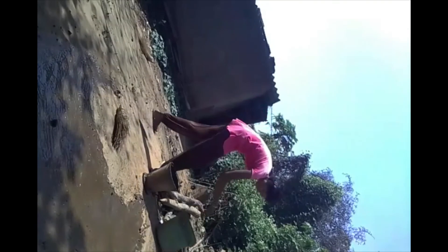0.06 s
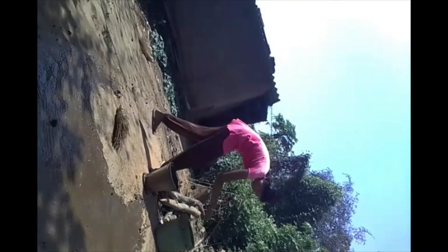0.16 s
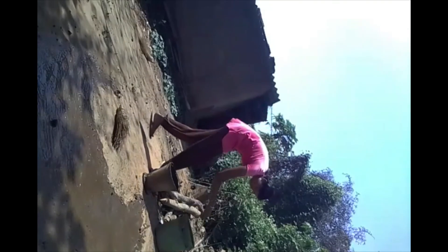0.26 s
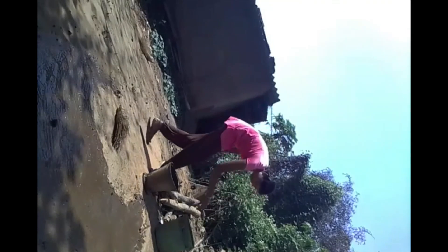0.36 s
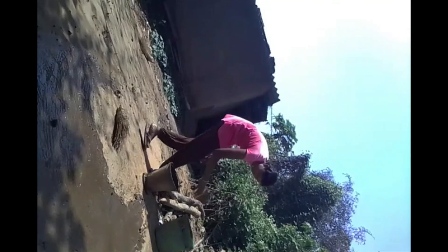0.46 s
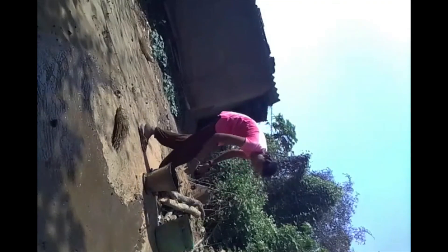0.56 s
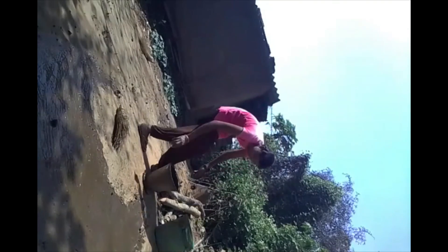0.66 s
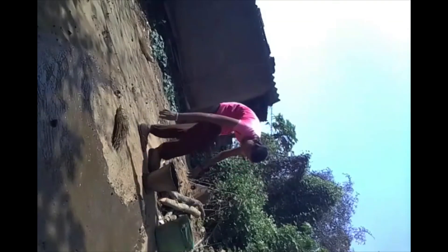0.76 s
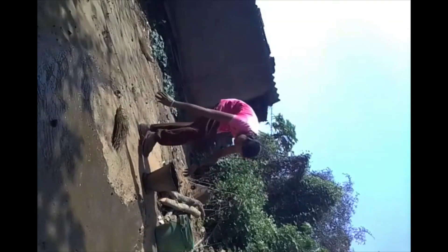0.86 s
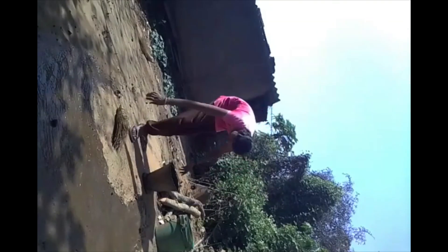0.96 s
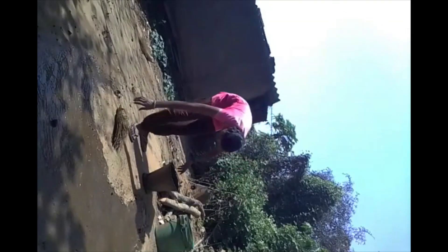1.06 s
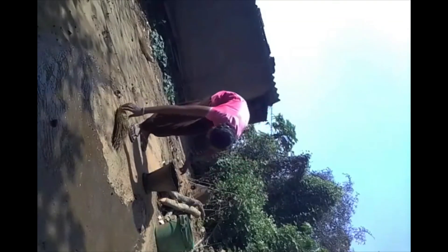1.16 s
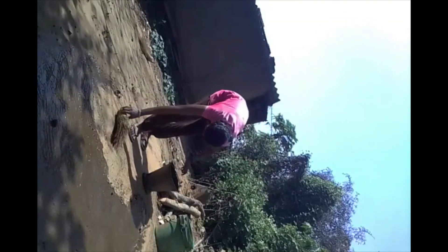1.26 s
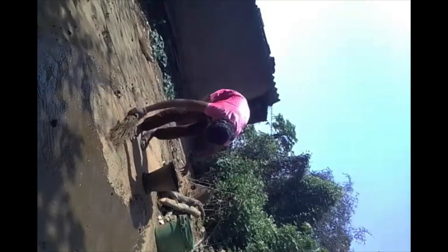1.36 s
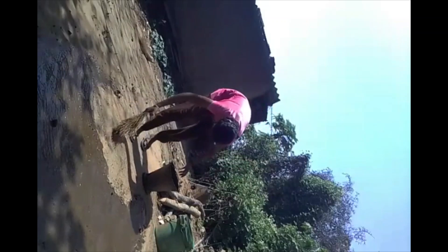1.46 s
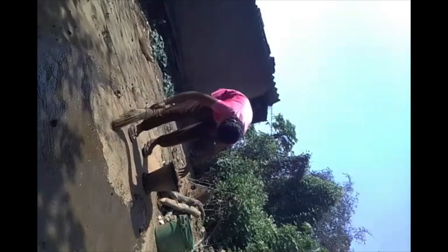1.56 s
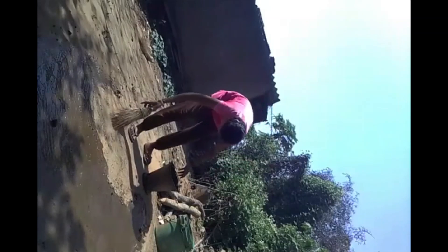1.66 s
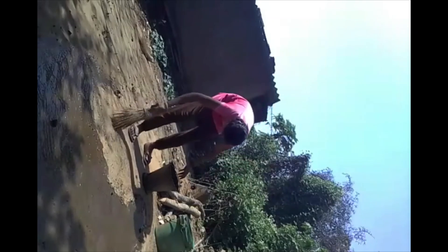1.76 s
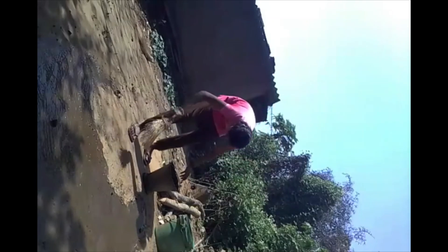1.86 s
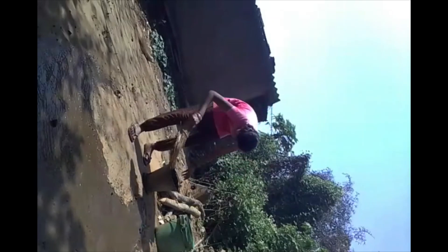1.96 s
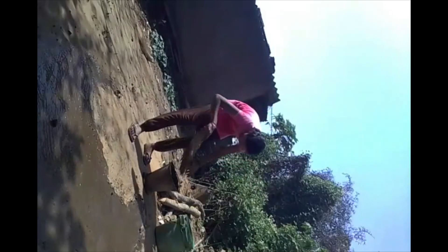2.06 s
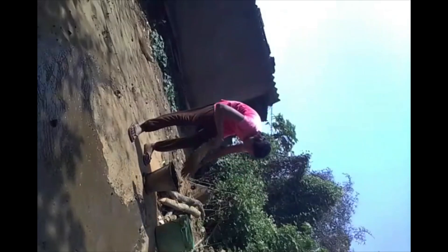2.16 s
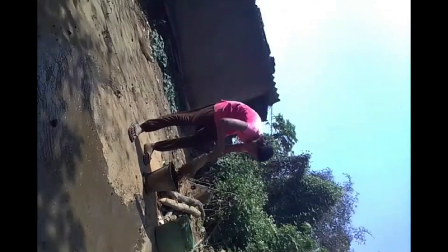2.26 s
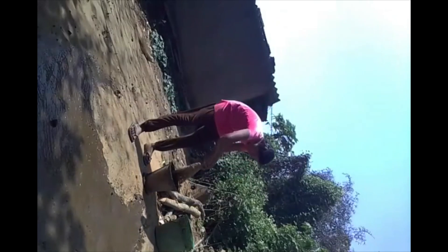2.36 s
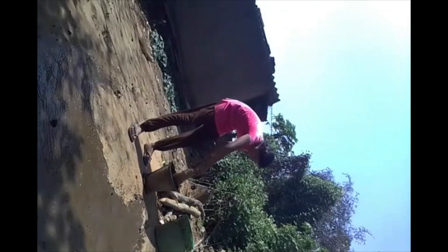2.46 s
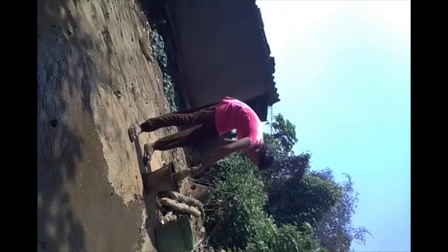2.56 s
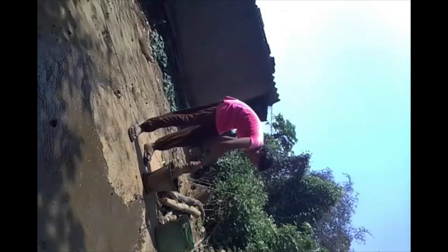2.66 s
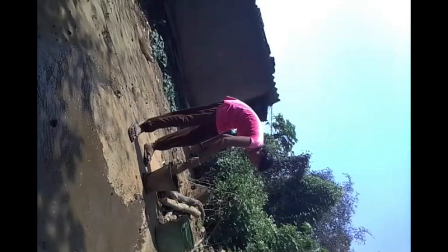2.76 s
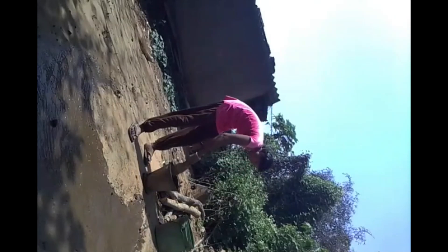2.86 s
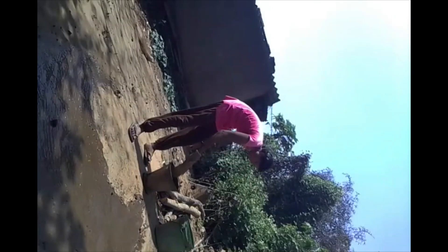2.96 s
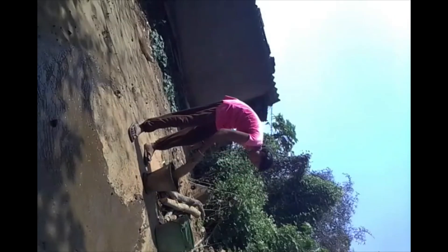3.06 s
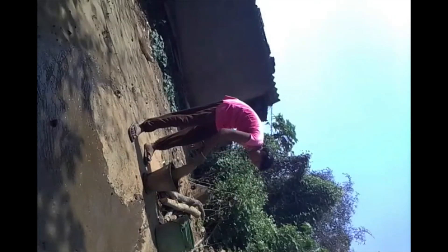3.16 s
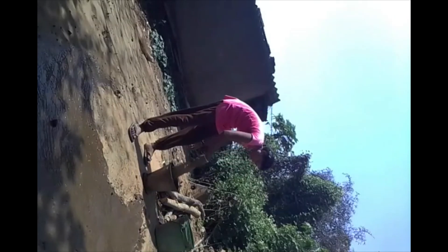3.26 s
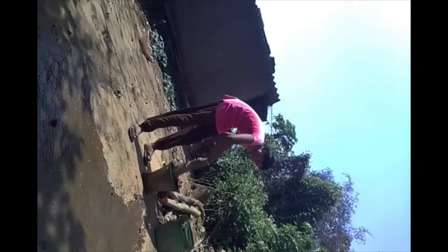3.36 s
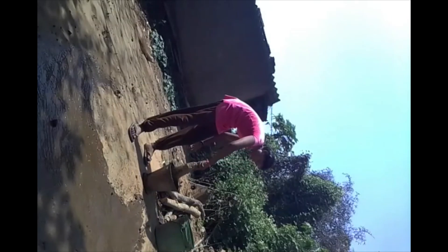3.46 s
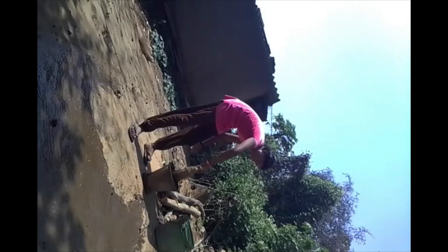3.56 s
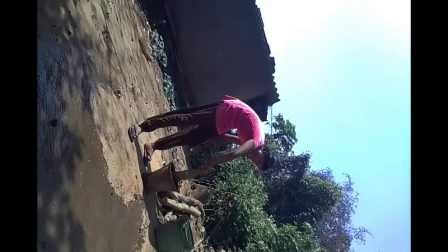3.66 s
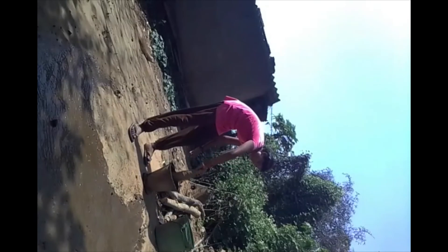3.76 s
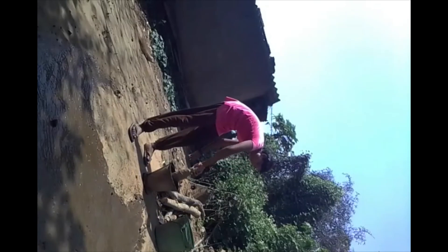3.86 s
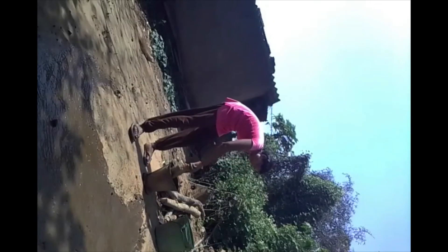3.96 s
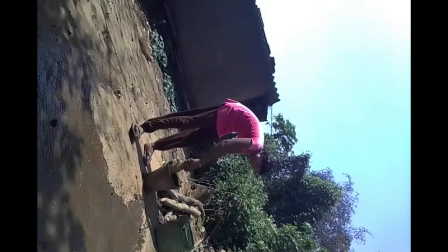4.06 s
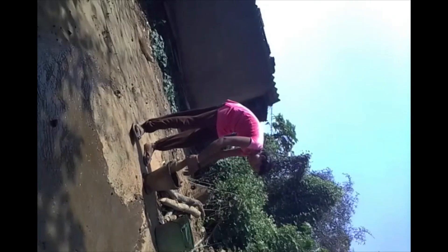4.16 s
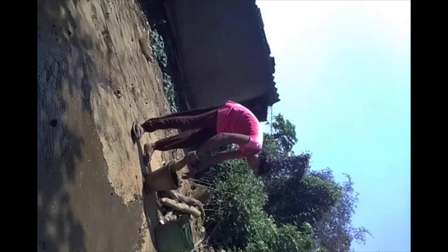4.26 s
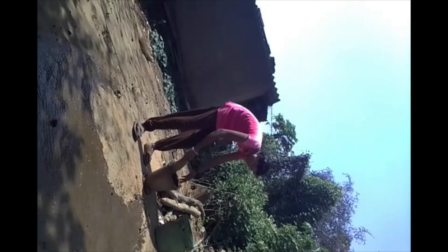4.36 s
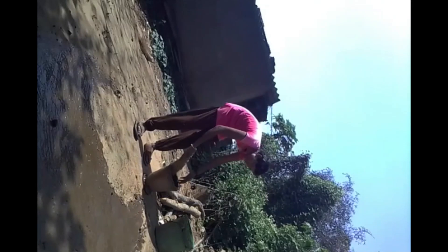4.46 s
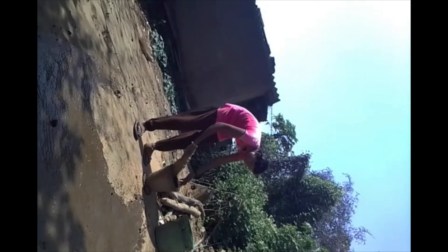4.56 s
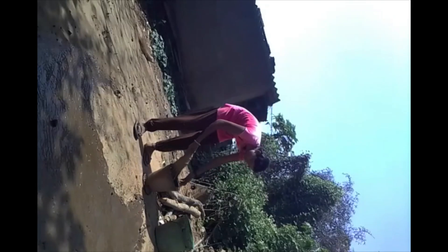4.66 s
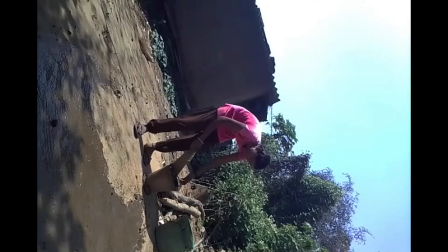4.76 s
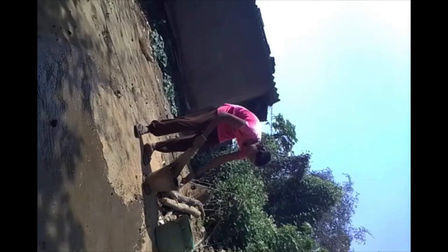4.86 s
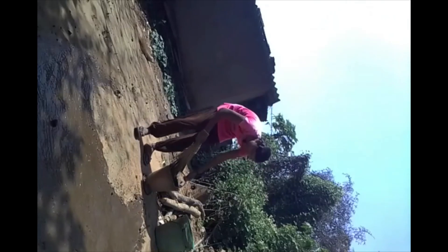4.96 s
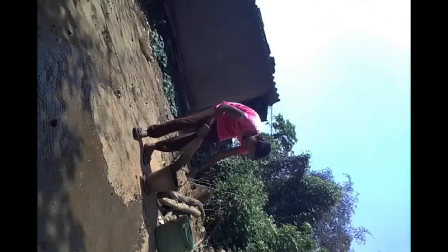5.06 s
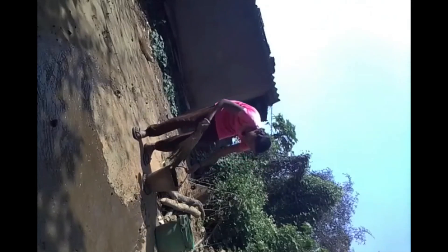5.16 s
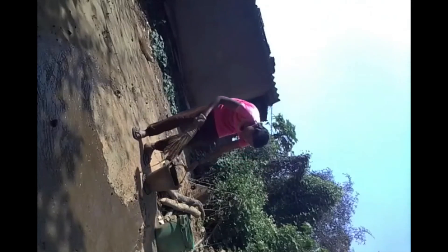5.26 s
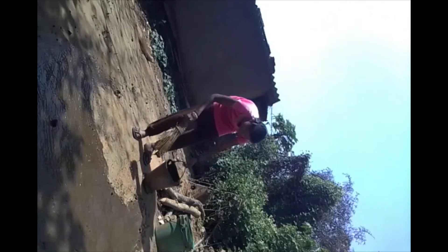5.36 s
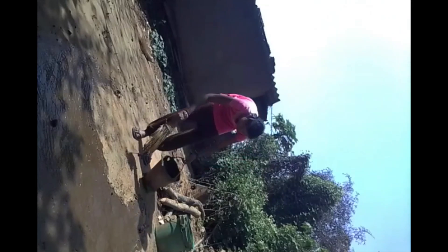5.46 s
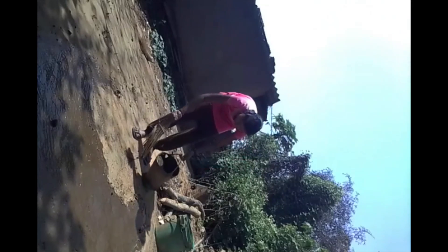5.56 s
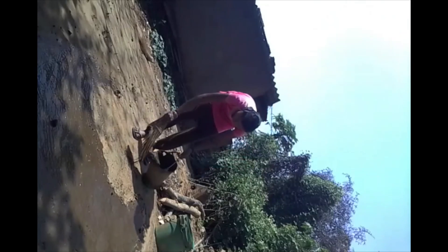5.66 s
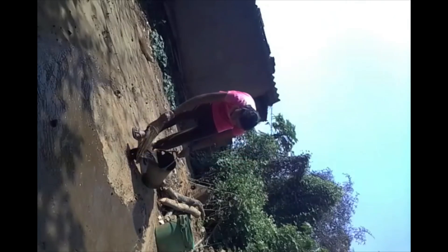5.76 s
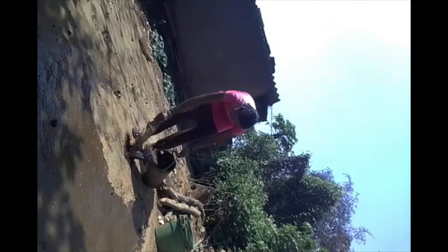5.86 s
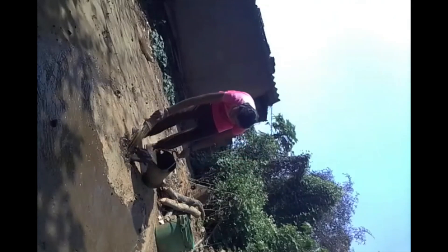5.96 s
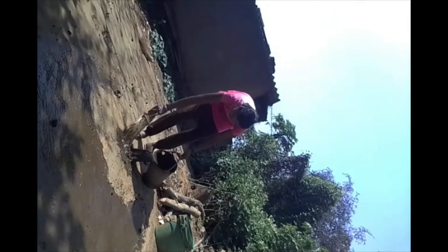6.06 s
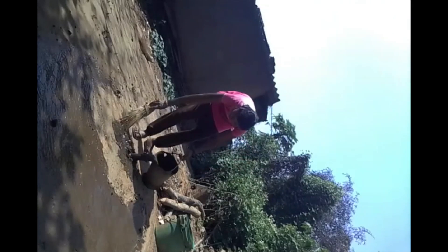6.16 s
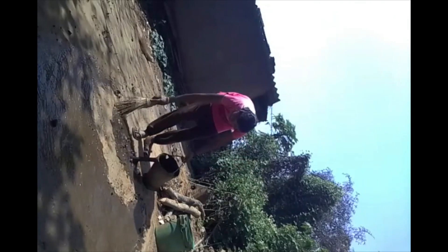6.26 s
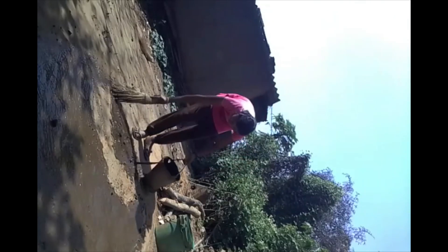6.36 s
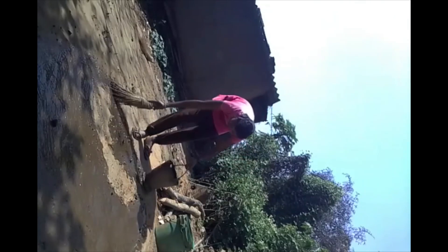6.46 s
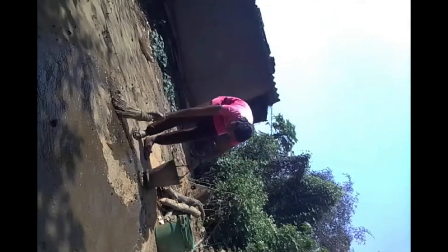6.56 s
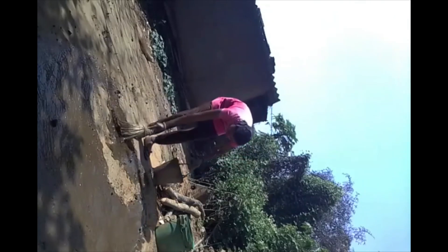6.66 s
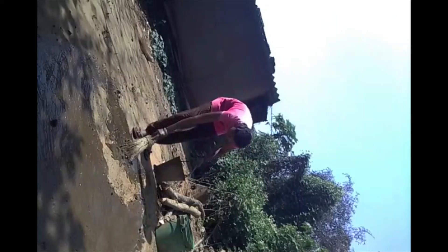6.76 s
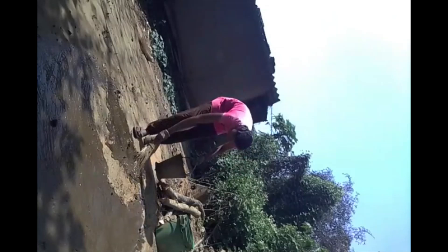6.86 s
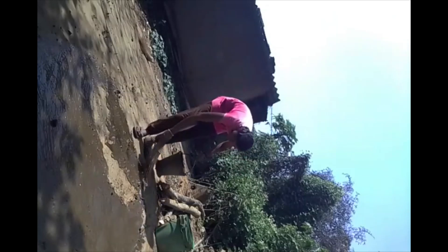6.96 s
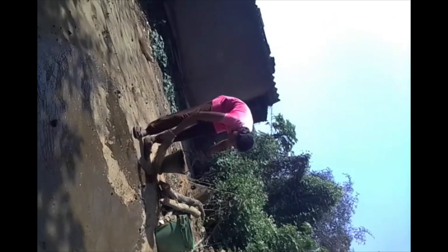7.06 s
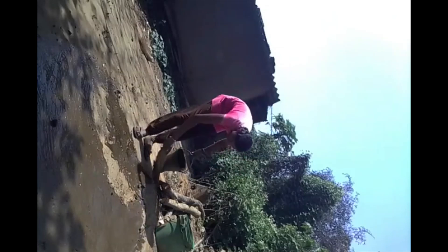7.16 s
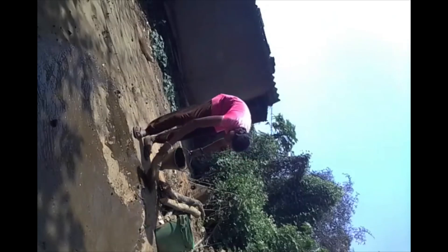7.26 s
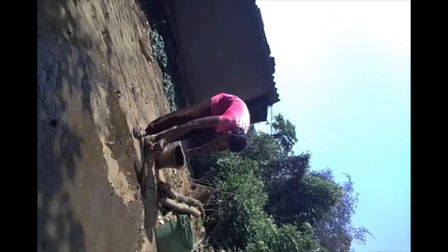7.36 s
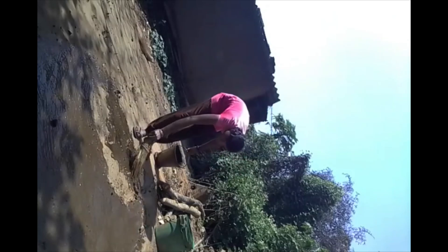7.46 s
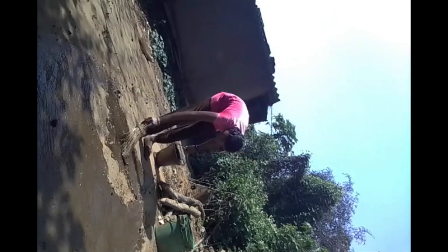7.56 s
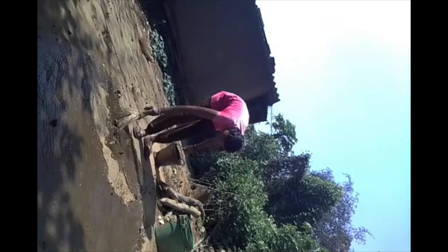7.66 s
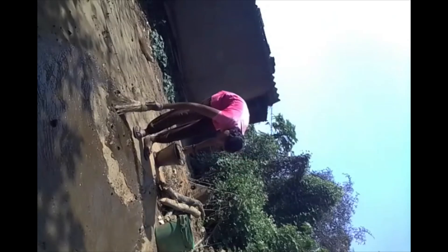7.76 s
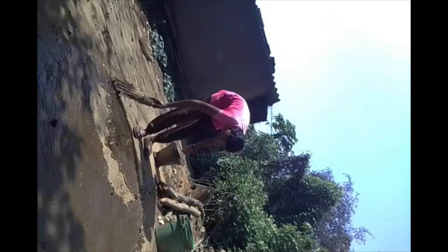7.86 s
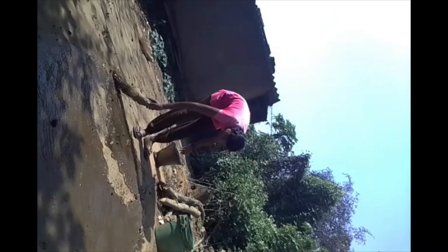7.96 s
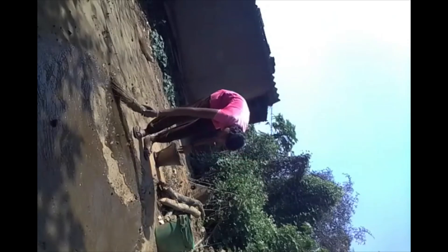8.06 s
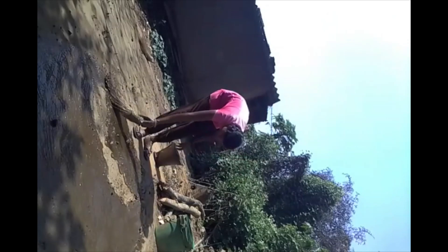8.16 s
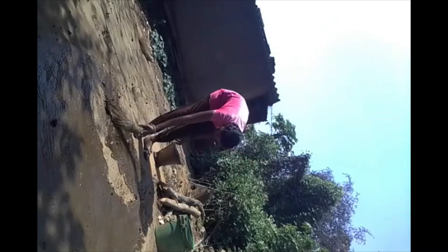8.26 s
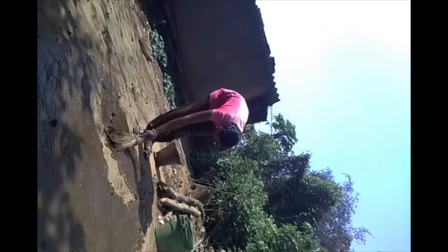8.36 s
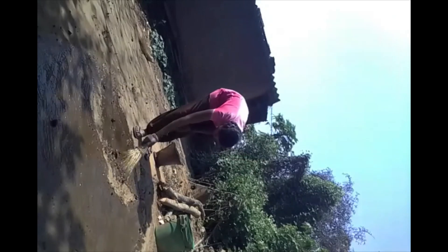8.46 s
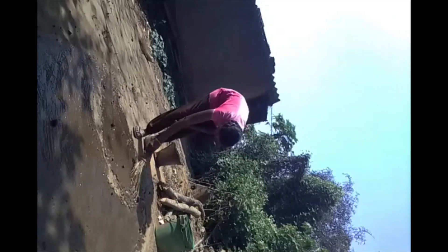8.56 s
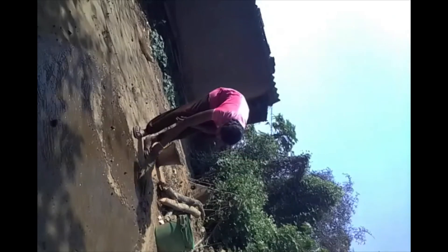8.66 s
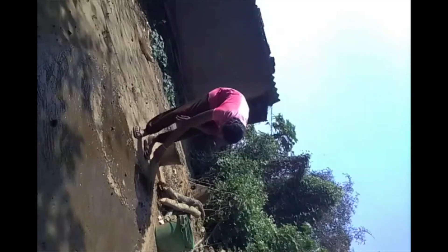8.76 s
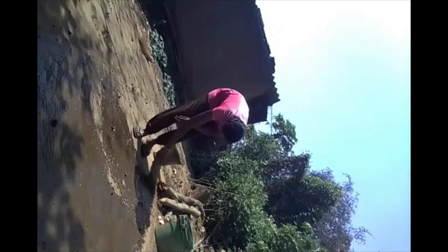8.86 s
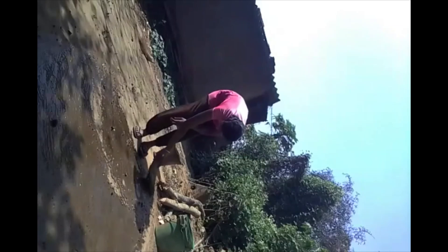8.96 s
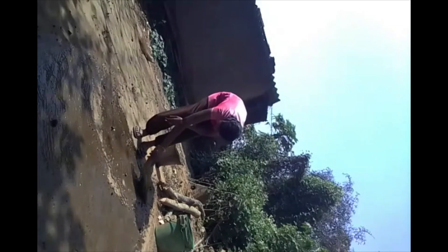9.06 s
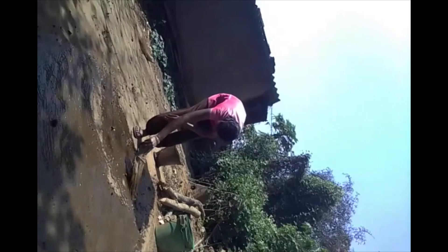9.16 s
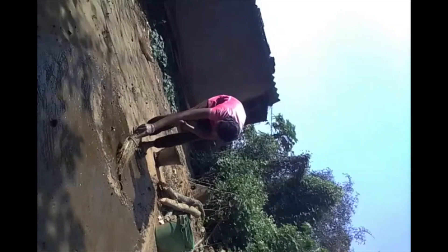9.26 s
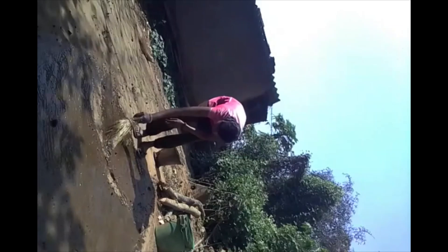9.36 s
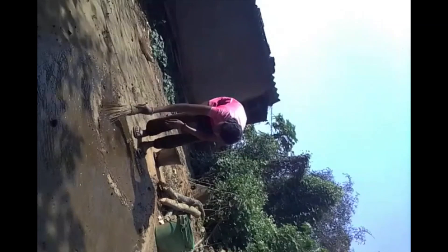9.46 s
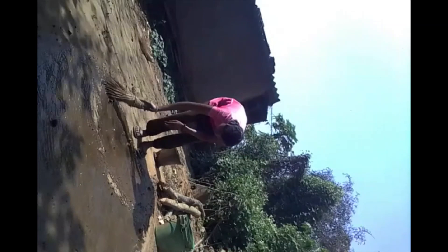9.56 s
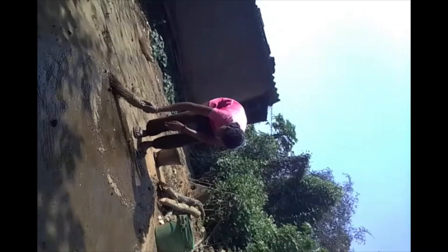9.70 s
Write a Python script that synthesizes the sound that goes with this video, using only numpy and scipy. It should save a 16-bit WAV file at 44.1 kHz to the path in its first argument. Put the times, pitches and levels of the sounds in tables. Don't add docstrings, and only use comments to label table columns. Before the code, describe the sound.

Short twig broom stirs lightly in a rattling bucket with wet ticks, then swishes hard over a mud yard while a hen clucks softly.

```python
import sys
import numpy as np
from scipy import signal
from scipy.fft import rfft, irfft, next_fast_len
from scipy.io import wavfile
from scipy.ndimage import uniform_filter1d

SR = 44100
rng = np.random.default_rng(int(sys.argv[2]) if len(sys.argv) > 2 else 0)


def digitize_waveform(pressure):
    field = np.atleast_2d(pressure).T
    bounded = np.clip(field, -1, 1)
    quanta = np.round(bounded * 32767).astype(np.int16)
    wavfile.write(sys.argv[1], SR, quanta)


def volts_from_db(level):
    exponent = np.asarray(level, float) / 20
    return 10 ** exponent


N = 429093
T = np.arange(N) / SR
CRACK_S = 0.0007


def colour(x, points):
    n = next_fast_len(len(x))
    hz = np.maximum(np.arange(n // 2 + 1) * SR / n, 1)
    point_hz, point_db = np.transpose(points)
    db = np.interp(np.log(hz), np.log(point_hz), point_db)
    y = irfft(rfft(x, n) * volts_from_db(db), n)[:len(x)]
    return y / np.std(y)


def band(x, lo_hz, hi_hz, order=2):
    sos = signal.butter(order, [lo_hz, min(hi_hz, 0.45 * SR)], "band", fs=SR, output="sos")
    return signal.sosfilt(sos, x)


def walk(rate, size=N):
    hold = max(int(SR / rate), 1)
    steps = np.repeat(rng.standard_normal(size // hold + 1), hold)
    return 1.374 * uniform_filter1d(steps, hold)[:size]


def add(out, s, x):
    i = max(int(s * SR), 0)
    out[i:i + len(x)] += x[:len(out) - i]


def broom():
    # low_hz, high_hz, slips_per_s, level_db, patchiness_db
    twig_groups = [
        (240, 1430, 1300, 3, 4),
        (1180, 2670, 1100, 4, 4.5),
        (2464, 4250, 1100, 6.5, 0.4),
        (4200, 7800, 970, 4.5, 2.5),
    ]
    tips_db, stems_db = effort()
    sweep_db, scrape_db = np.array([tips_db, stems_db]) + 0.45 * walk(45)
    hiss = slipping(1100, spread_db=2.8, even=0.59)
    out = band(hiss, 5660, 20200) * volts_from_db(sweep_db - 4.5 + 0.63 * walk(20))
    heavy = 0.32 * (scrape_db - sweep_db + 10)
    for lo_hz, hi_hz, rate, db, patchy_db in twig_groups:
        scrape = band(slipping(rate, spread_db=3.8, even=0.84), lo_hz, hi_hz)
        tilt_db = heavy * np.log2(2400 / lo_hz)
        out += scrape * volts_from_db(scrape_db + db + tilt_db + patchy_db * 0.75 * walk(30))
    return out


def effort():
    # start_s, length_s, level_db, scrape_db (stiffer twigs, re level)
    strokes = [(5.887, 0.32, -42.5, -3.5), (6.057, 0.49, -43, -3.5), (6.216, 0.23, -36, -6.5),
               (6.579, 0.56, -30, -8), (6.674, 0.19, -26.5, -9.5), (7.04, 0.25, -54.5, -5),
               (7.343, 0.61, -32, -10.5), (7.492, 0.29, -36, -4), (8.042, 0.6, -34.5, -11.5),
               (8.19, 0.34, -28, -10.5), (8.399, 0.59, -35, -8.5), (8.753, 0.09, -31, -15.5),
               (9.005, 0.69, -31.5, -9.5), (9.166, 0.14, -29.5, -11), (9.557, 0.27, -46, -7.5)]
    # start_s, length_s, level_db, scrape_db (re level)
    stirs = [(0.13, 0.27, -53, -8.5), (0.44, 0.26, -48, -16), (1.15, 0.28, -45, -17),
             (1.33, 0.34, -47.5, -36), (1.614, 0.34, -43.5, -21), (1.847, 0.11, -56, -30),
             (2.29, 0.46, -53.5, -11.5), (2.632, 0.39, -45.5, -12.5), (2.946, 0.38, -51, -14),
             (3.418, 0.2, -52, -14), (3.837, 0.32, -53, -13), (4.055, 0.49, -45.5, -12),
             (4.342, 0.4, -43, -12), (4.763, 0.65, -53, -12.5), (5.397, 1, -56, -12)]
    # start_s, level_db, decay_s, scrape_db (re level)
    soft_spurts = [(.165, -36.5, 0.014, -10), (.595, -33, 0.024, -25), (.634, -40.5, 0.033, -3.5),
                   (1.512, -40, 0.033, -32), (2.625, -40, .012, -14), (3.01, -43, 0.042, -20),
                   (3.238, -44, .02, -17), (3.505, -38.5, .015, -27), (3.641, -30.5, 0.039, -27),
                   (3.775, -36.5, 0.014, -30), (4.073, -35.5, 0.016, -9.5), (4.147, -40, .02, -28),
                   (4.885, -40.5, 0.037, -28), (5.54, -45, 0.06, -16), (5.655, -37.5, 0.022, -13.5),
                   (5.828, -43, 0.051, -11.5), (5.99, -36.5, 0.025, -0.5), (6.5, -46, 0.19, -11),
                   (5.005, -48, 0.018, -22), (5.135, -45.5, .04, -14), (5.205, -44.5, 0.028, -9),
                   (5.325, -49, 0.051, -11), (8.983, -38.5, 0.025, -8.5), (9.655, -32, 0.023, -14.5)]
    sharp_spurts = [
        (1.078, -37.5, 0.06, -8),
        (7.9765, -34, .015, -11),
        (8.0005, -38, 0.067, -5.5),
        (4.9, -41, 0.026, -20),
        (6.024, -39, .012, -20),
    ]
    rise_s, fall_s, swell = 0.22, 0.16, 1.27
    rest_db, rest_scrape_db = -58, -72.5
    moves = []
    for s, length, db, scrape_db in strokes + stirs:
        t = T[:int(length * SR)]
        up = t / min(rise_s, length / 2)
        down = (length - t) / min(fall_s, length / 2)
        shape = np.sin(np.pi / 2 * np.clip(np.minimum(up, down), 0, 1)) ** swell
        moves.append((s, shape, db, scrape_db))
    t = T[:12000]
    for spurts, onset_s in ((soft_spurts, 0.0091), (sharp_spurts, 0.002)):
        for s, db, decay_s, scrape_db in spurts:
            shape = np.minimum(t / onset_s, 1) * np.exp(-t / max(decay_s, 0.004))
            moves.append((s, shape, db, scrape_db))
    tips, stems = np.full(N, volts_from_db(2 * rest_db)), np.full(N, volts_from_db(2 * rest_scrape_db))
    for s, shape, db, scrape_db in moves:
        add(tips, s, (volts_from_db(db) * shape) ** 2)
        add(stems, s, (volts_from_db(db + scrape_db) * shape) ** 2)
    return 10 * np.log10(tips), 10 * np.log10(stems)


def slipping(rate, spread_db, even):
    # pitch_hz, level_db (per Hz)
    twig_colour = [(250, -21.5), (600, -8), (1100, -3.5), (2500, -0.5), (4000, 0.5), (7500, -2), (11000, 1),
                   (14000, -2)]
    sizes = volts_from_db(spread_db * np.minimum(rng.exponential(size=N), 4))
    slips = (rng.random(N) < rate / SR) * sizes
    decay = np.exp(-1 / (0.0017 * SR))
    scratch = signal.lfilter([1], [1, -decay], slips ** 2)
    loudness = np.sqrt(even + scratch / np.mean(scratch))
    return colour(loudness * rng.standard_normal(N), twig_colour)


def ticks():
    # start_s, peak_db
    drips = [(1.9456, -22), (1.9977, -26), (2.356, -19), (2.4172, -18), (2.4753, -21), (2.5556, -17),
             (2.6292, -13.5), (2.7002, -18), (2.7636, -20.5), (2.7832, -13), (3.0132, -18), (3.067, -21),
             (3.5115, -15), (3.6378, -11.5), (3.6537, -8), (3.6724, -7.5), (3.784, -19), (3.9674, -19),
             (3.9875, -20.5), (4.0771, -10.5), (4.15, -10.5), (4.549, -19), (4.6586, -15), (4.796, -19),
             (4.8927, -18.5), (5.0136, -22), (5.2106, -27), (5.2725, -32), (5.4705, -20), (5.544, -20.5),
             (5.6636, -25), (5.831, -16), (5.8856, -27), (5.9215, -23), (4.9737, -23)]
    # start_s, peak_db
    flicks = [(.4693, -20), (.5711, -17), (.5995, -16), (1.197, -20), (1.518, -16), (1.7838, -22),
              (1.8544, -20), (5.9965, -8), (6.0244, -6.5), (6.4118, -17), (6.5216, -11), (6.541, -19),
              (6.6253, -15), (7.1956, -25), (7.3837, -24), (8.0985, -10.5), (8.1364, -14), (8.21, -8),
              (8.256, -5), (8.326, -8), (8.347, -12), (8.9892, -19), (9.0327, -18), (9.1217, -16),
              (9.6604, -11.5), (9.6799, -12)]
    # start_s, peak_db
    snaps = [(.1641, -30), (.2538, -24.5), (.3601, -29), (.5015, -26), (.636, -12.5), (1.0793, -38),
             (1.092, -22), (1.095, -24), (1.1025, -22), (1.114, -21), (4.368, -21), (5.1043, -29),
             (6.499, -21), (6.7968, -14), (6.8345, -6), (6.8365, -7), (6.737, -9), (7.4256, -27),
             (7.4855, -34), (7.9774, -16), (8.0016, -15.5), (8.0073, -17), (8.0118, -22), (8.0174, -21),
             (8.0228, -25), (8.7891, -20), (9.1676, -17)]
    splutter_s = 0.004
    out, t = np.zeros(N), T[:1500]
    for events, body_db in ((drips, -33), (flicks, -31.5), (snaps, -12)):
        for s, db in events:
            decay = np.exp(-t / CRACK_S) + 0.26 * np.exp(-t / splutter_s)
            burst = rng.standard_normal(len(t)) * decay
            fine, body = band(burst, 7440, 18200), band(burst, 1300, 10200)
            add(out, s, volts_from_db(db - 13) * fine / np.max(np.abs(fine)))
            add(out, s, volts_from_db(db + body_db + 7) * body / np.max(np.abs(body)))
    return out


def handle():
    # start_s, peak_db
    bounces = [(7.978, -20), (7.983, -34), (8.001, -22), (8.0073, -22), (8.0113, -24), (8.018, -26),
               (8.0228, -31), (8.0285, -33), (8.0422, -29), (6.8345, -11.5), (6.836, -16), (1.0918, -36),
               (3.968, -44)]
    wire_hz, t60_s = 5020, 0.0063
    out, t = np.zeros(N), T[:600]
    shape = np.exp(-np.log(1000) * t / t60_s) * np.minimum(t / CRACK_S, 1)
    for s, db in bounces:
        ratios = 1 + 0.078 * rng.standard_normal(2)
        ring = sum(np.sin(2 * np.pi * wire_hz * ratio * t) for ratio in ratios)
        add(out, s, volts_from_db(db - 3.5) * ring * shape)
    return out


def bucket():
    # start_s, peak_db, ring_hz, upper_modes_db, rattle_s
    knocks = [(0.173, -20.5, 389, -25, 0.013), (0.214, -35.5, 352, -24.5, 0.021),
              (.256, -35.5, 415, -7, 0.02), (.364, -39, 405, -11, 0.021), (.444, -41.5, 520, -7, .012),
              (0.478, -44.5, 420, -13, 0.017), (.503, -44.5, 1100, -4, .012),
              (.519, -48, 420, -14.5, 0.011), (.535, -49, 560, -3, .015), (.584, -33, 475, -5.5, 0.0068),
              (.59, -34, 620, -6, .005), (.6, -37.5, 430, -7.5, 0.017), (0.639, -25, 472, 2, 0.0083),
              (.644, -25, 400, -5, .006), (.654, -28.5, 398, -10.5, 0.011), (.676, -37.5, 560, -2.5, .012),
              (.73, -53, 476, -8, .01), (.792, -50.5, 552, -15, .01), (1.054, -55, 754, -15, .005),
              (1.091, -42, 620, 0, .004), (1.1149, -32, 640, -2.5, .003), (1.325, -50, 550, -5.5, 0.023),
              (1.5, -53, 1180, -14.5, 0.0045), (1.58, -48, 720, -3, 0.0083), (1.836, -47, 649, -8.5, .006),
              (2.096, -47, 646, -7, 0.012), (3.25, -46.5, 500, -12.5, .008),
              (4.381, -39.5, 680, -4.5, 0.019), (5.1, -46, 430, -2.5, .01), (5.184, -38, 723, -3.5, 0.0096),
              (6.293, -39, 567, -7.5, .01), (6.487, -42, 580, -6.5, .01), (6.59, -47, 433, -12, 0.0054),
              (7.152, -43, 470, -5, .015), (7.163, -40, 1000, -14.5, .015),
              (8.004, -24.5, 636, -24.5, 0.0053), (8.012, -35, 616, -19.5, .006),
              (8.019, -30, 614, -8, .004), (8.027, -36, 600, -20, 0.0065), (8.036, -35.5, 523, -16, 0.016)]
    # ratio (to ring_hz), level_db, t60_s
    wall_modes = [
        (1.038, 7.5, 0.031),
        (1.56, 13, 0.0082),
        (2.2, 8.5, 0.014),
        (3.3, -4, 0.039),
        (0.62, -14, 0.03),
    ]
    out, t = np.zeros(N), T[:6000]
    for s, db, hz, upper_db, rattle_s in knocks:
        rattle = rng.standard_normal(len(t)) ** 3 * np.exp(-t / np.clip(rattle_s, 0.003, 0.1))
        contact_s = np.clip(-upper_db * 0.000383, 0.0005, 0.012)
        press = np.sin(np.pi * np.minimum(t / contact_s, 1)) / (contact_s * SR / 3)
        push = 0.036 * volts_from_db(0.56 * upper_db) * rattle + np.cos(2 * np.pi * hz * t) * press
        modes = []
        for ratio, mode_db, t60_s in wall_modes:
            mode_hz = hz * ratio * (1 + 0.047 * rng.standard_normal())
            decay = np.exp(-np.log(1000) * t / t60_s)
            modes.append(volts_from_db(mode_db) * np.sin(2 * np.pi * mode_hz * t) * decay)
        ring = modes[0] + volts_from_db(min(upper_db, 0)) * sum(modes[1:])
        hit = band(signal.fftconvolve(push, ring)[:len(t)], 265, 9900, order=3)
        add(out, s - 0.0015 - 0.423 * contact_s, volts_from_db(db + 2.5) * hit / np.max(np.abs(hit)))
    return out


def birds():
    near, far = hen(), far_birds()
    tail = rng.standard_normal(12000) * np.exp(-np.log(1000) * T[:12000] / 0.13)
    tail /= np.sqrt(np.sum(tail ** 2))
    echo = signal.fftconvolve(volts_from_db(-9) * near + far, tail)[:N]
    return near + far + echo


def hen():
    # start_s, length_s, pitch_hz, level_db
    clucks = [(4.099, 0.038, 646, -52.5), (4.375, 0.055, 664, -49), (4.633, 0.062, 648, -49),
              (4.899, 0.042, 670, -46), (5.141, 0.05, 680, -47), (5.379, 0.035, 677, -45.5),
              (5.647, 0.048, 670, -48), (5.978, 0.054, 685, -47.5), (6.302, 0.075, 718, -46),
              (6.369, 0.093, 690, -47), (6.859, 0.032, 710, -42.5), (7.171, 0.019, 714, -45)]
    answers = [(5.211, 0.07, 693, -44.5), (5.3, 0.042, 705, -59), (5.435, 0.058, 714, -46.5),
               (5.741, 0.06, 703, -47), (6.066, 0.062, 707, -42.5), (6.445, 0.027, 734, -43),
               (6.592, 0.033, 700, -49), (6.64, 0.086, 726, -44.5), (6.906, 0.096, 720, -42),
               (7.212, 0.054, 703, -43.5)]
    cluck_throat, answer_throat = [0, -11, -22], [0, -19, -22]
    out = np.zeros(N)
    for calls, glide, throat in ((clucks, 320, cluck_throat), (answers, -370, answer_throat)):
        for s, length, hz, db in calls:
            voice = note(length, hz, hz + glide * length, throat, hoarse=0.36, edge=0.25)
            croak = note(0.026, 1.5 * hz, 1.15 * hz, [0], hoarse=0.9, edge=0.3)
            add(out, s, volts_from_db(db + 1) * voice)
            add(out, s - 0.008, volts_from_db(db - 11) * croak)
    return out


def far_birds():
    # start_s, length_s, start_hz, end_hz, level_db
    high_crow = [
        (2.62, 0.2, 768, 753, -65.5),
        (2.9, .35, 770, 729, -63.5),
    ]
    crow_end = [
        (3.41, 0.36, 711, 672, -63),
        (3.76, 0.16, 664, 655, -64),
    ]
    low_crow = [
        (2.24, 0.17, 639, 627, -68),
        (2.74, 0.096, 635, 634, -67),
        (2.83, 0.2, 635, 645, -58),
        (3.0, 0.245, 649, 621, -64.5),
        (3.32, .13, 621, 604, -64),
    ]
    shrill_crow = [
        (2.52, .1, 793, 780, -56),
        (4.47, 0.07, 750, 760, -66),
        (4.76, 0.043, 787, 770, -67),
        (5.0, 0.065, 746, 763, -61),
    ]
    sparrows = [(.965, 0.032, 4200, 3140, -68), (1.15, 0.23, 4200, 3660, -75),
                (1.425, 0.025, 3110, 3050, -65), (2.03, 0.045, 4300, 2840, -67),
                (2.2, 0.075, 4770, 3900, -68), (2.2, 0.041, 3970, 3400, -66),
                (2.24, 0.036, 3400, 3350, -73), (3.49, 0.17, 4900, 4750, -69),
                (3.85, 0.062, 4600, 3900, -66), (3.84, .05, 4000, 3600, -70)]
    far_calls = [(1.58, 0.032, 1400, 1380, -64), (5.17, 0.047, 1345, 1390, -64),
                 (6.31, .06, 1370, 1340, -52.5), (6.455, .035, 1320, 1340, -55.5),
                 (6.6, 0.046, 1390, 1370, -58), (7.17, 0.046, 1560, 1490, -63),
                 (7.215, 0.058, 1415, 1327, -56), (6.0, .07, 1380, 1380, -52.5),
                 (5.47, 0.036, 840, 840, -56.5), (2.27, 0.23, 1120, 1098, -69.5),
                 (2.66, 0.091, 1090, 1100, -67), (2.93, 0.36, 770, 690, -60.5), (3.77, .13, 660, 570, -58.5),
                 (2.53, 0.245, 640, 660, -64), (3.35, .1, 680, 700, -63), (3.05, 0.22, 1175, 1106, -68),
                 (5.39, 0.0643, 1320, 1370, -60), (5.67, 0.05, 1340, 1390, -61),
                 (5.984, 0.0059, 2300, 1900, -39), (6.031, 0.0083, 2200, 2000, -43),
                 (6.24, 0.032, 1000, 980, -52), (6.565, 0.062, 1040, 988, -54.5),
                 (7.27, 0.12, 1400, 1350, -68)]
    high_throat, end_throat = [0.58, -0.15, -16.5], [-2, 0, -12]
    low_throat, shrill_throat = [0.81, -6, -1.5], [-6, 0, -26]
    voices = [(high_crow, high_throat, 0.8), (crow_end, end_throat, 0.5), (low_crow, low_throat, 0.5),
              (shrill_crow, shrill_throat, 0.25), (sparrows, [0], 0.12), (far_calls, [0], 0.6)]
    out = np.zeros(N)
    for calls, throat, hoarse in voices:
        for s, length, hz0, hz1, db in calls:
            add(out, s, volts_from_db(db) * note(length, hz0, hz1, throat, hoarse, edge=0.072))
    beads_db = 2.5 * np.clip(walk(55), -2, 0.8)
    return out * volts_from_db(beads_db)


def note(length, hz0, hz1, partials_db, hoarse, edge):
    size = int(length * SR)
    u = np.arange(size) / (length * SR)
    pitch_shake, level_shake = walk(160, size), walk(90, size)
    pitch_hz = (hz0 + (hz1 - hz0) * u) * (1 + 0.045 * hoarse * pitch_shake)
    phase = 2 * np.pi * np.cumsum(pitch_hz) / SR
    tone = sum(volts_from_db(db) * np.sin(k * phase) for k, db in enumerate(partials_db, 1))
    shape = np.clip(np.minimum(u / edge, (1 - u) / (2 * edge)), 0, 1)
    return np.sqrt(2) * tone * shape * volts_from_db(3.2 * hoarse * level_shake)


def engine():
    # time_s, level_db (of the strongest order)
    swells = [(0, -80), (.19, -62), (.45, -81), (3, -76.5), (5.2, -70.5), (5.75, -63.5), (6.4, -68),
              (6.8, -65), (7.6, -69.5), (8.1, -60.5), (8.4, -73), (8.65, -59), (8.9, -63), (9.3, -59)]
    # multiple (of the turning rate), level_db
    engine_orders = [(2, -14), (3, -13.5), (4, -4), (5, -7), (6, -7.5), (7, -6.5)]
    turn_hz = 39.24 * (1 + 0.00555 * walk(2.2))
    phase = 2 * np.pi * np.cumsum(turn_hz) / SR
    hum = sum(volts_from_db(db + 3 * walk(8)) * np.sin(k * phase + k * k) for k, db in engine_orders)
    rumble = band(rng.standard_normal(N), 180, 350) * volts_from_db(16.5 + 2.1 * walk(12))
    time_s, level_db = np.transpose(swells)
    return (hum + rumble) * volts_from_db(np.interp(T, time_s, level_db) + 1.5)


def yard():
    # pitch_hz, level_db (per Hz)
    air_colour = [(40, -16), (100, -9), (254, 3), (665, 0.5), (1360, -5.5), (2230, -11), (5280, -15.5),
                  (14000, -29)]
    swell = walk(1.41)
    air = np.zeros(N)
    for lo_hz in 25 * 2.0 ** np.arange(0, 9.5, 0.5):
        breath = band(rng.standard_normal(N), lo_hz, lo_hz * np.sqrt(2))
        air += breath * volts_from_db(0.6 * swell + 2.4 * walk(9))
    return volts_from_db(-57) * colour(air, air_colour)


def scene():
    return (broom() + ticks() + handle() + bucket() + birds() + engine() + yard())[None]


def port(x):
    # pitch_hz, width_hz, gain_db
    hz, width_hz, gain_db = (11390, 1490, 13.04)
    b, a = signal.iirpeak(hz, hz / width_hz, fs=SR)
    return x + (volts_from_db(gain_db) - 1) * signal.lfilter(b, a, x)


def dropouts(x):
    # time_s, level_db (of the mid bands)
    mid_dips = [(0.026, -15), (1.628, -17), (1.768, -60), (2.183, -9), (2.335, -29), (2.498, -43),
                (2.822, -14), (2.991, -5), (3.784, -25), (4.915, -18), (5.062, -19), (5.318, -17),
                (5.49, -15), (6.341, -21), (6.47, -17), (6.578, -16), (6.854, -10), (7.112, -11),
                (7.365, -16), (7.581, -21), (7.642, -26), (7.967, -42), (8.39, -23), (8.818, -16.5)]
    # time_s, pitch_hz, width_hz, gain_db
    standout_bands = [(1.768, 2650, 120, 3), (1.628, 3470, 120, 5), (5.318, 7140, 200, 10),
                      (5.49, 6320, 250, 17), (6.47, 6000, 900, 13), (6.47, 8000, 250, 10), (7.967, 3500, 300, 6),
                      (8.39, 9600, 300, 2)]
    hz, s, lines = signal.stft(x, SR, nperseg=1024, noverlap=768)
    power = np.abs(lines) ** 2 + 1e-18
    around = np.exp(uniform_filter1d(np.log(power), size=30, axis=0))
    standing = np.minimum(power / around, 30)
    patch = uniform_filter1d(uniform_filter1d(standing, size=2, axis=0), size=7, axis=1)
    starved_db = sum(db * np.clip(1.8 - np.abs(s - gap_s) / 0.0059, 0, 1) for gap_s, db in mid_dips)
    gain_db = -14 * (patch < 1.02) * (hz > 2600)[:, None] + starved_db * (patch < 4.2)
    gain_db = gain_db * ((hz > 400) & (hz < 9800))[:, None]
    for gap_s, keep_hz, width_hz, db in standout_bands:
        near_hz = np.abs(hz - keep_hz) < width_hz / 2
        near_s = np.abs(s - gap_s) < 0.013
        gain_db[np.ix_(near_hz, near_s)] = db
    return signal.istft(lines * volts_from_db(gain_db), SR, nperseg=1024, noverlap=768)[1][:N]


def roll_off(x):
    return signal.sosfilt(signal.butter(12, 15270, fs=SR, output="sos"), x)


def record(dry):
    heard = dropouts(port(dry[0]))
    top_cut = signal.ellip(8, 0.2, 43, 13800, fs=SR, output="sos")
    mix = signal.sosfilt(top_cut, heard)
    return roll_off(mix[None])


dry = scene()
out = record(dry)
digitize_waveform(out)
```